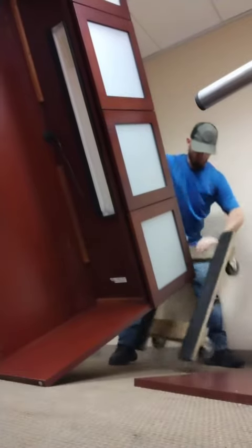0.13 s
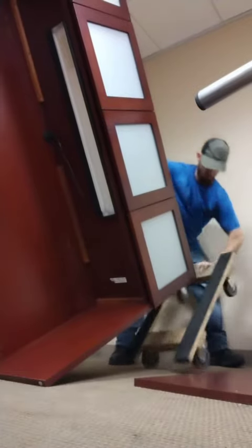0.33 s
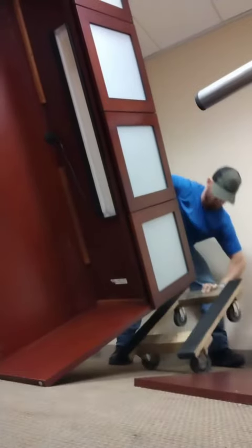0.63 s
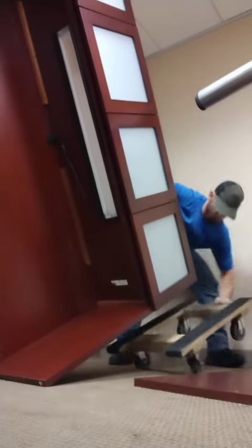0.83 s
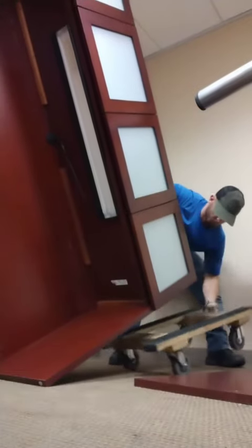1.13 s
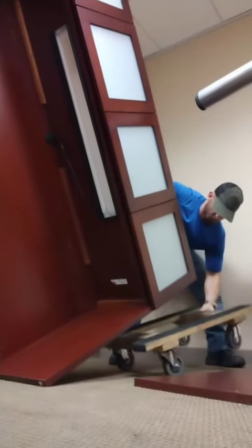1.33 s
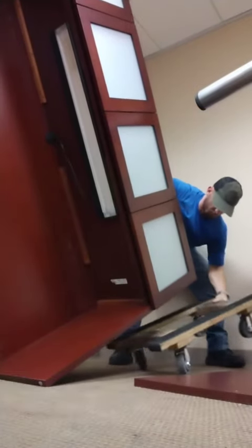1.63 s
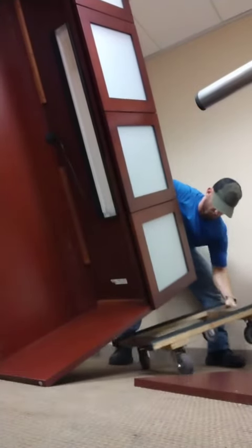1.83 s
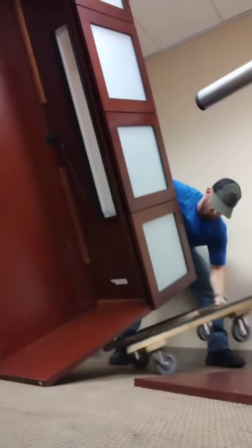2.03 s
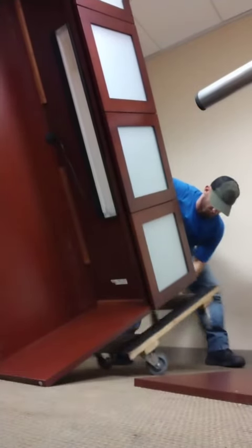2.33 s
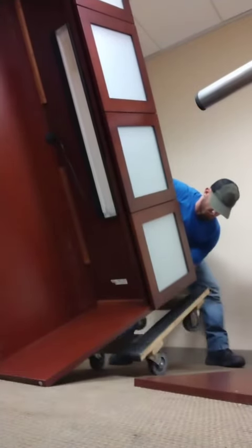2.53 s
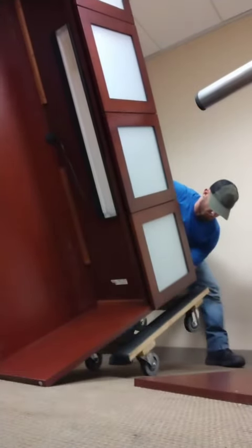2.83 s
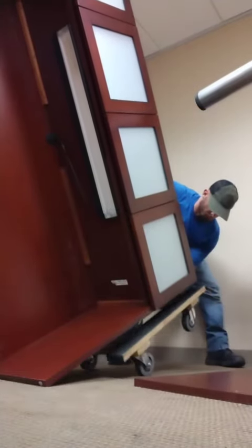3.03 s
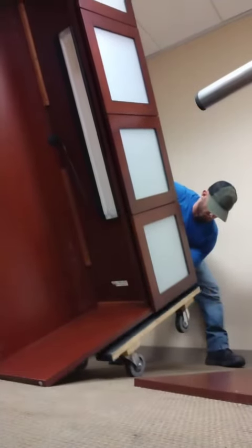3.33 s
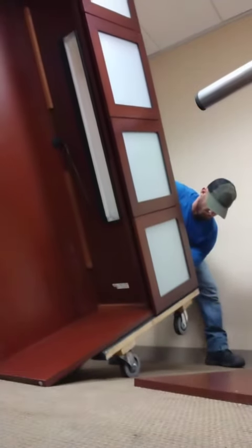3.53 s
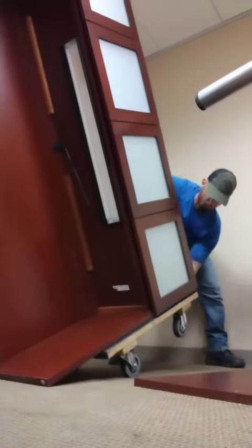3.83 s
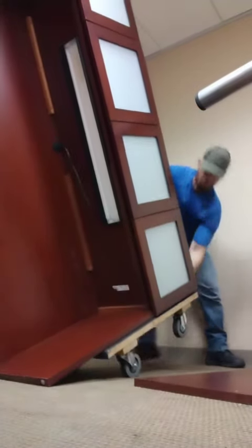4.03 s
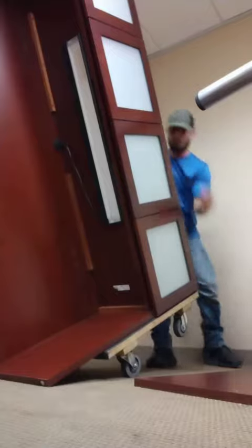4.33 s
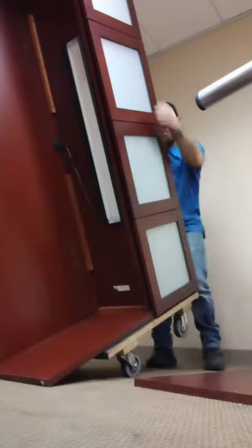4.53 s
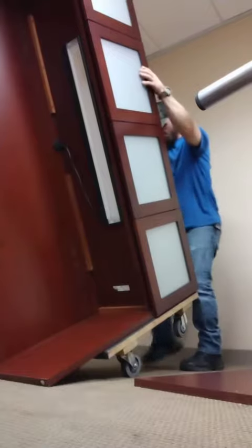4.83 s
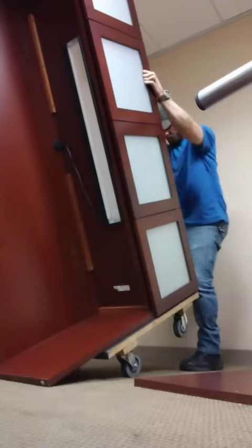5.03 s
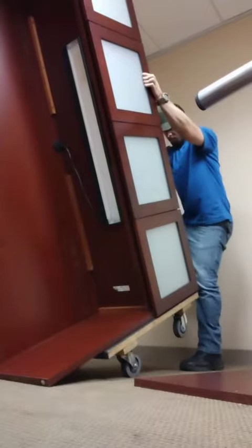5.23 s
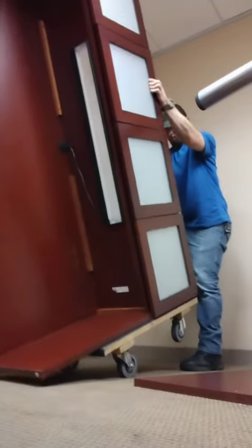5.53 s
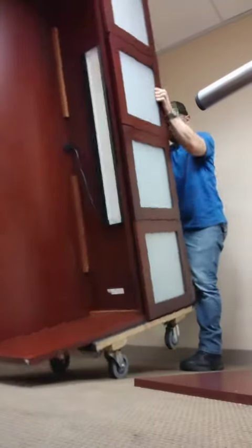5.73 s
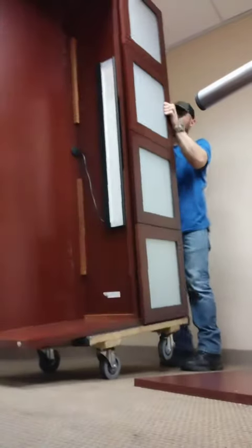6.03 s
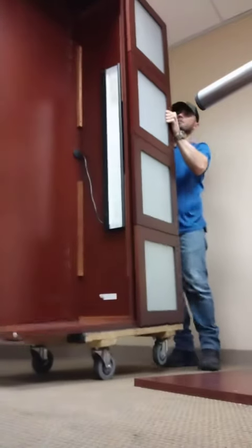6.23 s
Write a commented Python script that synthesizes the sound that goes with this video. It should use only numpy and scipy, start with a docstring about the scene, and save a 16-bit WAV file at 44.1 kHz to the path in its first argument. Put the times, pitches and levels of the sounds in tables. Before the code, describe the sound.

In a carpeted office with faint ventilation, a wooden dolly on casters drops with a very loud, sharp clack and rattling bounces. It is dragged with short scrapes and small knocks amid cloth rustle. After a near-quiet pause, a tall cabinet thuds onto it in a quick cluster with a low groan, then hands slide, wood creaks and softer thumps follow. One dull microphone sits near the floor.

```python
"""A wooden dolly on casters is dropped to the carpet of an office, dragged under a tall tilted cabinet
and knocked against its base, and the cabinet is rocked upright onto it: contact noise rings wood modes
and a room tail. Dragging is lumpy friction noise, clothes and sliding hands patchy hiss, the ventilation
air noise with wavering tones. One dull microphone near the floor."""
import sys
import numpy as np
from scipy import signal
from scipy.io import wavfile
from scipy.ndimage import uniform_filter1d

SR = 44100
rng = np.random.default_rng(int(sys.argv[2]) if len(sys.argv) > 2 else 0)


def int16_out(signal):
    """Quantize to a 16-bit WAV file."""
    q = np.round(np.clip(np.atleast_2d(signal).T, -1, 1) * 32767)
    wavfile.write(sys.argv[1], SR, q.astype(np.int16))


N = 281799


def gain_of(db):
    """Amplitude gain of a level in dB."""
    return 10 ** (np.asarray(db) / 20)


def evened(x):
    """Scale to unit RMS."""
    return x / np.sqrt(np.mean(x ** 2) + 1e-20)


def read(points, hz):
    """Interpolate a (Hz, value) table over log frequency."""
    f, value = np.transpose(points)
    return np.interp(np.log(hz + 1), np.log(f + 1), value)


def add(mix, s, sound):
    """Mix a sound in at s seconds, cut at the end of the mix."""
    part = mix[round(s * SR):][:len(sound)]
    part += sound[:len(part)]


def band(x, lo_hz, hi_hz, order=2):
    """Butterworth band-pass."""
    sos = signal.butter(order, [lo_hz, hi_hz], "band", fs=SR, output="sos")
    return signal.sosfilt(sos, x)


def noise(field_db, size=512):
    """Random short-time spectra under a level field of Hz, seconds and smoothed random patches."""
    hop = size // 4
    hz = np.fft.rfftfreq(size, 1 / SR)[:, None]
    t = np.arange(N // hop + 5) * hop / SR
    real, imag, patches = rng.standard_normal((len(t), len(hz), 3)).T
    patches = uniform_filter1d(patches, size // 64, 0)
    patches = evened(uniform_filter1d(patches, 12, 1))
    spectra = (real + 1j * imag) * gain_of(field_db(hz, t, patches))
    return signal.istft(spectra, nperseg=size, noverlap=size - hop)[1][:N]


def stroke(t, start, attack, hold, release, level_db):
    """Gain with attack, hold and release in straight dB lines, zero outside."""
    depth_db = 22.5  # ends lie this far under the level
    knots = start + np.cumsum([0, attack, hold, release])
    level = level_db - depth_db * np.interp(t, knots, [1, 0, 0, 1])
    return gain_of(level) * (t > knots[0]) * (t < knots[-1])


def ventilation():
    """Patchy air noise plus tones: noise-modulated carriers, each of a narrow width."""
    # air spectrum: f/Hz, relative level/dB
    air = [(25, -29.5), (60, -13.5), (130, -3.5), (200, -17.5), (600, -11.5), (1000, -18.5), (1500, -34),
           (3000, -32), (8000, -40.5)]
    # narrow tones: f/Hz, width/Hz, level/dB
    hum = [(141, 12, -74.5), (235, 11, -79.5), (1244, 3.7, -79), (1262, 2.5, -83.5), (1846, 2.5, -99),
           (3100, 6, -99)]
    air_db = -73.5
    wash = noise(lambda hz, t, patches: read(air, hz) + 2.5 * patches, size=2048)
    out = gain_of(air_db) * evened(wash)
    for hz, width_hz, db in hum:
        pole = np.exp(-np.pi * width_hz / SR)
        source = rng.standard_normal(N) + 1j * rng.standard_normal(N)
        waver = signal.lfilter([1 - pole], [1, -pole], source)
        carrier = np.exp(2j * np.pi * hz * np.arange(N) / SR)
        out += gain_of(db) * evened((waver * carrier).real)
    return out


def rustle():
    """Patchy hiss of moving cloth, plus strokes of hands sliding over wood that tilt it brighter."""
    # clothes in motion: t/s, level/dB
    motion = [(0, -94), (.36, -82), (.55, -72), (.89, -79), (1.2, -73), (1.4, -83), (1.87, -83.5),
              (2.1, -78), (2.3, -86), (2.85, -93.5), (3.2, -92.5), (3.4, -75.5), (3.85, -72), (4.33, -73),
              (4.66, -80.5), (4.9, -73.5), (5.3, -73), (5.8, -82), (6.1, -75), (6.39, -76)]
    # cloth spectrum: f/Hz, relative density/dB
    cloth = [(710, -28), (1200, 4), (1930, -3.5), (3180, -3), (3730, -6), (6050, -8), (7580, -16),
             (8220, -18), (10700, -47.5), (18100, -120)]
    # hands on wood: start/s, attack/s, hold/s, release/s, level/dB, brightness/(dB per octave)
    slides = [(0.895, 0.037, 0.084, .12, -55, 1.2), (1.63, .025, .012, .1, -72, .4),
              (4.34, 0.043, 0.011, 0.1, -70, 4.8), (4.49, 0.057, .012, .12, -74, 5),
              (4.87, 0.017, 0.065, .1, -70, 2.7), (5.01, 0.026, 0.011, 0.085, -67.5, 8.1),
              (6.09, .05, .04, 0.17, -72.5, 2.5)]
    cloth_bright_db_per_octave = 0.17
    s, level_db = np.transpose(motion)

    def plain_field(hz, t, patches):
        return read(cloth, hz) + 2.0 * patches

    def moving_field(hz, t, patches):
        octaves = np.log2((hz + 1) / 4500)
        cloth_db = np.interp(t, s, level_db) + cloth_bright_db_per_octave * octaves
        power = gain_of(2 * cloth_db)
        for *shape, bright_db in slides:
            power = power + (stroke(t, *shape) * gain_of(bright_db * octaves)) ** 2
        return plain_field(hz, t, patches) + 10 * np.log10(power)

    # levels refer to the 3.5-7.5 kHz RMS of steady cloth
    plain = noise(plain_field, size=256)
    reference = np.sqrt((band(plain, 3500, 7500) ** 2).mean())
    return noise(moving_field, size=256) / reference


def drag():
    """Wood and casters creaking under load: lumpy friction noise around each stroke's centre."""
    # start/s, attack/s, hold/s, release/s, level/dB, centre f/Hz
    strokes = np.array([(0.894, .035, 0.097, .18, -41.5, 376), (1.17, .03, .012, 0.068, -55, 490),
                        (1.54, 0.064, .13, 0.13, -56, 470), (1.86, .22, 0.066, .13, -48.5, 370),
                        (2.3, .15, 0.19, 0.24, -67.5, 421), (3.561, .03, .1, .03, -52.5, 300.6),
                        (3.68, 0.039, .14, 0.23, -34.5, 238), (4.13, .045, .19, 0.12, -58, 260),
                        (4.46, 0.098, 0.45, .05, -63, 210), (5.048, 0.17, .012, .05, -58.5, 199.8),
                        (5.289, 0.057, .012, 0.08, -38, 270), (5.398, 0.077, .18, 0.094, -48.5, 275),
                        (5.75, .13, 0.032, .2, -60.5, 225), (5.999, 0.087, 0.087, 0.22, -43, 235),
                        (6.223, 0.18, .05, .05, -45.5, 190)])

    def field(hz, t, patches):
        gains = np.array([stroke(t, *row[:5]) for row in strokes]) + 1e-9
        centre_hz = strokes[:, 5] @ gains / gains.sum(0)
        octaves = np.log2((hz + 20) / centre_hz)
        above_db = -4.0 * np.maximum(octaves, 0) ** 1.96
        below_db = 3.6 * np.minimum(octaves, 0)
        return above_db + below_db + 1.5 * patches

    grit = noise(field, size=1024)
    grit /= np.sqrt(abs(uniform_filter1d(grit ** 2, 4410)) + 1e-20)  # unit RMS over 0.1 s
    t = np.arange(N) / SR
    envelope = sum(stroke(t, *row[:5]) for row in strokes)
    return grit * uniform_filter1d(envelope, size=350)


def ring(modes, t, spot_db=4.5):
    """Dying sines; each blow lands on another spot and varies their levels and pitches."""
    hz, db, t60 = np.transpose(modes)[:, :, None]
    spot = rng.standard_normal((len(modes), 2))
    decay = gain_of(db + spot_db * spot[:, :1] - 60 * t / t60)
    pitch_hz = hz * (1 + 0.022 * spot[:, 1:])
    return (decay * np.sin(2 * np.pi * pitch_hz * t)).sum(0)


def room_tail(t, damping):
    """Dense reflections, each band dying at its own speed, building up over the first milliseconds."""
    # office decay: f/Hz, t60/s before the damping factor
    office = [(100, 0.26), (400, 0.72), (1000, 0.42), (2500, 0.35), (3500, 0.23), (5000, 0.18),
              (8000, 0.17)]
    hz, frames, spectra = signal.stft(rng.standard_normal(len(t)), SR, nperseg=256)
    t60 = damping * read(office, hz)[:, None]
    tail = signal.istft(spectra * gain_of(-60 * frames / t60), SR, nperseg=256)[1][:len(t)]
    return tail * (1 - np.exp(-t / .004))


def blow(row, modes, rise_s, chatter_s, damping, knock_db, tick_db, snap_db=-2, colour_db=-5):
    """Chattering contacts ring the wood and the office; weight and hardness set five band levels."""
    # crack, knock, rap: low f/Hz, high f/Hz
    crack, knock, rap = [(700, 1420), (385, 700), (1750, 3400)]
    # loose parts smear the treble more; tail of crack, thump, knock, rap, tick: added level/dB
    smears_db = [-1.2, -5.6, -7.2, 2.8, 2.2]
    knock_per_weight, tick_per_hardness = 0.47, 1.65
    thump_span = 1.5  # band from pitch / span to pitch x span
    s, crack_db, weight_db, hard_db, tail_db, thump_hz = row
    thump = (thump_hz / thump_span, thump_hz * thump_span)
    # softer blows lower the top of the tick, an octave per 42 dB
    tick = (rap[1], 8000 * 2 ** (np.clip(hard_db, -30, 0) / 42))
    bands = [crack, thump, knock, rap, tick]
    levels_db = crack_db + np.array([
        0, weight_db, knock_db + knock_per_weight * weight_db,
        hard_db, tick_db + tick_per_hardness * hard_db])

    t = np.arange(SR // 2) / SR
    push = (1 - np.exp(-t[:2048] / rise_s)) * np.exp(-t[:2048] / chatter_s)
    contacts = rng.standard_normal(2048) ** 2 * rng.choice([-1, 1], 2048) * push
    wood = ring(modes, t[:8192])
    wood /= np.linalg.norm(wood)
    snap = np.exp(-2 * np.pi * 550 * t[:8192])  # dry push of the contact, weaker in the treble
    snap /= np.linalg.norm(snap)
    direct = signal.fftconvolve(contacts, wood + gain_of(snap_db) * snap)
    # reflections and rattling keep only part of the wood colour
    colour = gain_of(colour_db) * wood + snap
    tail = signal.fftconvolve(room_tail(t, damping), colour)[:len(t)]
    tail *= 1 - np.exp(-t / chatter_s)
    lowest_hz = .95 * modes[0][0]
    direct = band(direct, lowest_hz, 9000, order=4)
    tail = band(tail, lowest_hz, 9000, order=4)

    out = np.zeros(len(t))
    for i, (db, edges, smear_db) in enumerate(zip(levels_db, bands, smears_db)):
        part = band(tail, *edges, order=3)
        part *= gain_of(tail_db + smear_db) / np.linalg.norm(part)
        first = band(direct, *edges, order=3)
        add(part, 0, first / np.linalg.norm(first))
        if i == 0:  # crack level is its peak, the others their highest 20 ms RMS
            crest = abs(part).max()
        else:
            crest = np.sqrt(uniform_filter1d(part ** 2, 882).max())
        out += gain_of(db) * part / crest
    return s, out


def cabinet_blows():
    """Cabinet panels thud and the floor booms, each blow with its own thump pitch."""
    # t/s, crack level/dB, thump re crack/dB, rap re crack/dB, tail re direct/dB before smear, thump f/Hz
    rows = [(3.588, -35, -7, -21.5, 11, 120), (3.637, -39, 1.5, -19.5, 3, 110),
            (3.661, -37.5, 4, -20, 1.5, 115), (3.685, -23, -8.5, -27.5, 3, 149.5),
            (3.729, -18.5, -18, -26, -1.5, 201), (3.762, -31.5, 0, -13.5, 1.4, 170),
            (3.78, -31, 2.5, -20, -3.5, 139), (3.81, -36.5, 5.5, -19.5, 0.5, 152),
            (3.871, -39, 5.5, -19, 1.9, 100), (3.92, -35.5, -3, -19.5, 0, 110),
            (3.979, -48.5, 3.5, -12, 4.5, 125), (4.082, -47.5, -2, -17, 1.2, 105),
            (4.164, -63, 6.5, -0.5, 6, 150), (4.192, -41, -6.5, -18, 5.5, 152),
            (4.218, -45.5, 1.5, -12, 3.4, 134), (4.294, -50.5, 3, -15, 0, 130),
            (4.585, -58.5, -1.5, -16, 1.2, 120), (4.688, -59, -0.5, -13, 3.5, 130),
            (4.839, -52, 4, -17, 3.5, 85), (4.882, -68.5, 11.5, 6.5, 1.6, 100),
            (4.955, -52, -5, -14, 1.3, 170), (5.037, -56, 0.6, -24, 0.5, 130),
            (5.085, -65, 8, -10.5, 2, 100), (5.24, -50, -3, -15.5, 3.5, 125),
            (5.299, -45.5, -4, -8.5, 8.5, 220), (5.311, -29, -4.5, -17, 1.5, 235),
            (5.322, -38, 5.5, -14.5, 0.6, 265), (5.351, -40, 4, -15, 2.5, 295),
            (5.399, -45, 3, -14, 3, 250), (5.507, -31.5, 1.5, -17.5, -1.5, 150),
            (5.709, -57.5, 10, -15, 5.4, 140), (5.749, -55.5, 5, -18, 3, 140), (5.98, -55, 6, -14, 3, 109),
            (6.059, -36, -1, -34, 4, 150), (6.076, -49.5, 23, -19, 2.7, 221), (6.103, -54, 19, -10, 6, 290),
            (6.21, -57, 18.5, -9, 5.5, 85), (6.266, -53.5, 1, -15, 5.5, 130),
            (6.32, -62, 17.5, -7.5, 3, 85)]
    # panel modes, varied per blow: f/Hz, level/dB, t60/s
    modes = [(78, -12, .2), (105, -3, .2), (133, -6, .15), (221, 1, .12), (250, 0, .11), (312, -4, .08),
             (398, -3, .08), (476, -2, .08), (550, -6, .06), (690, -6, .06), (775, -5, .05), (955, -1, .05),
             (1087, 0, .05), (1340, -2, .05), (1515, 0, .05), (2200, 1, .03), (2690, -3, .03),
             (4000, -2, .03)]
    out = np.zeros(N)
    for row in rows:
        add(out, *blow(row, modes, rise_s=0.0011, chatter_s=0.0037, damping=0.75,
                       knock_db=-5.5, tick_db=-5.5))
    return out


def dolly_blows():
    """The dropped and knocked dolly rings its wooden frame, with one thump pitch throughout."""
    # t/s, crack level/dB, thump re crack/dB, rap re crack/dB, tail re direct/dB before smear
    rows = [(0.385, -18, -16, -16.5, 13.5), (0.434, 0.4, -27.5, -26, -5), (0.448, -8, -23, -15, -6.5),
            (0.469, -9.5, -25, -19.5, 4), (0.611, -8, -19.5, -27, -2), (0.623, -16.5, -21, -18, 11.5),
            (0.658, -24, -12, -14, 1.5), (0.699, -23.5, -14, -16, 18), (0.794, -32, -7, -20, 13),
            (0.912, -36.5, -17.5, -6.5, 4.5), (0.939, -35.5, -13, -7.5, -3), (0.969, -35.5, -6, -1.2, 0.6),
            (1.17, -44.5, -14, -21, -3.5), (1.187, -49, -7, -16, 5), (1.539, -60.5, -5.5, -8, 3),
            (1.617, -45.5, -15, -24, 5.5), (1.646, -51.5, -10.5, -8.5, -4), (1.748, -52.5, -7, -19.5, 4),
            (1.924, -58, -3, -15, 2.5), (1.957, -49.5, -10, -23.5, 18), (2.08, -45, -18, -10.5, 9),
            (2.121, -38.5, -16, -24.5, 18), (2.154, -42.5, -11.5, -21, 5.5), (2.459, -58, -24, -20, 1),
            (2.521, -61.5, -12, -22, 9)]
    # frame modes, varied per blow: f/Hz, level/dB, t60/s
    modes = [(135, -8, .12), (170, -4, .1), (220, -6, .1), (395, 0, .09), (440, 1, .09), (530, -2, .07),
             (618, -2, .06), (695, 1, .07), (772, 0, .06), (877, 0, .06), (950, 0, .06), (1075, 2, .06),
             (1325, -1, .05), (1400, -2, .05), (1485, -6, .05), (1865, -5, .04), (2180, 3, .04),
             (2330, 2, .04), (2700, -1, .04), (3900, 0, .03)]
    thump_hz = 185.1
    out = np.zeros(N)
    for row in rows:
        add(out, *blow((*row, thump_hz), modes, rise_s=0.0009, chatter_s=0.0048, damping=0.86,
                       knock_db=0.4, tick_db=-1.8))
    return out


def scene():
    """Sum of all layers, one channel."""
    return (ventilation() + rustle() + drag() + cabinet_blows() + dolly_blows())[None]


def record(dry):
    """The microphone loses deep bass and rounds off high peaks; then band limit and converter hiss."""
    mic_hz, edge_hz, hiss_db, ceiling = 60, 7900, -101.5, .94
    high_pass = signal.butter(3, mic_hz, "high", fs=SR, output="sos")
    thin = signal.sosfilt(high_pass, dry)
    rounded = ceiling * thin / (ceiling ** 4 + thin ** 4) ** (1 / 4)
    low_pass = signal.firwin(201, edge_hz, window=("kaiser", 9), fs=SR)
    dull = signal.oaconvolve(rounded, low_pass[None], "same")
    return dull + gain_of(hiss_db) * rng.standard_normal(dry.shape)


dry = scene()
out = record(dry)
int16_out(out)
```